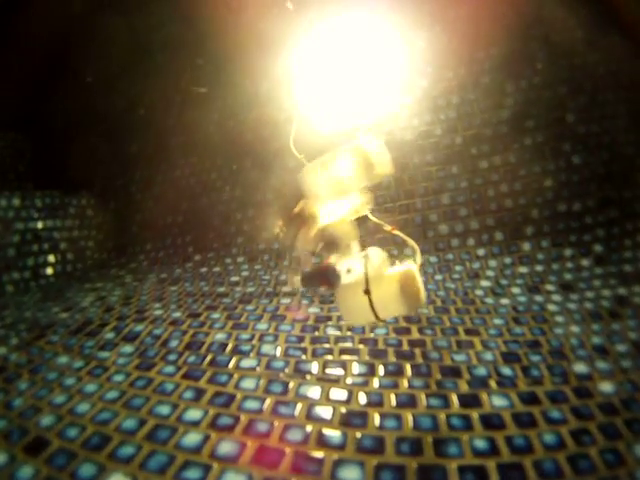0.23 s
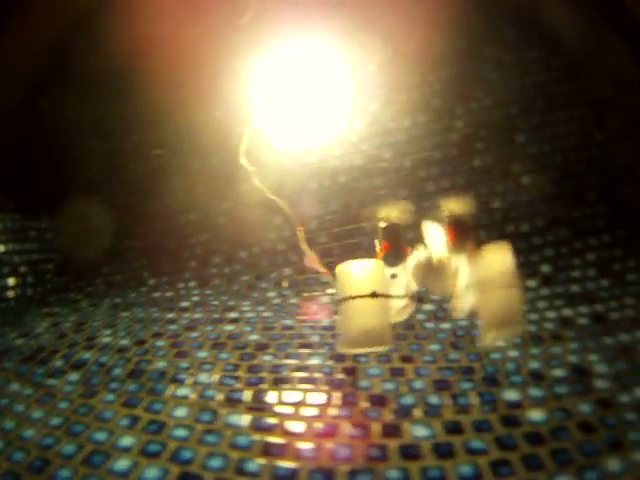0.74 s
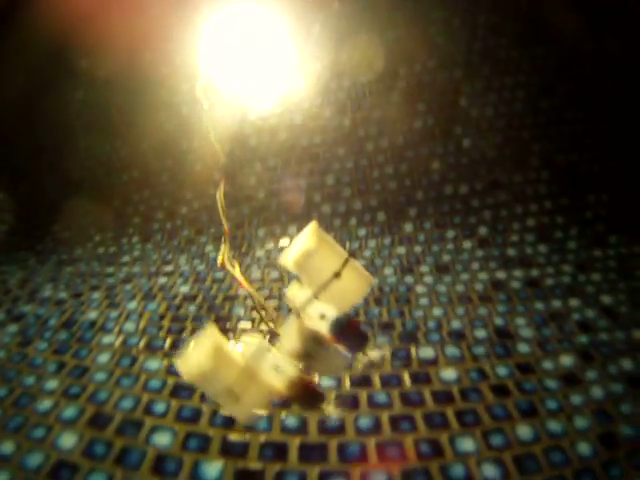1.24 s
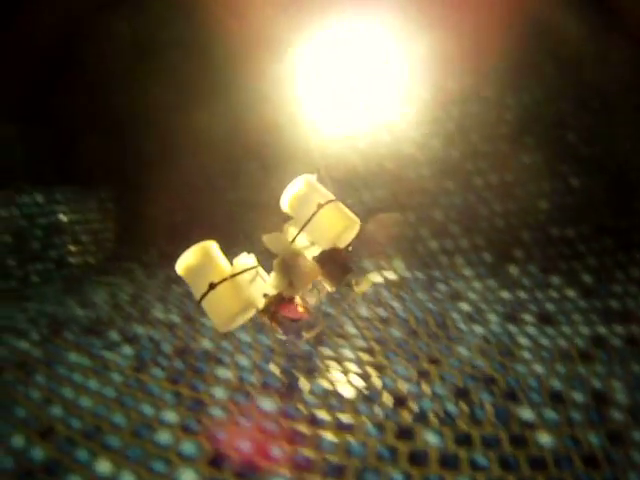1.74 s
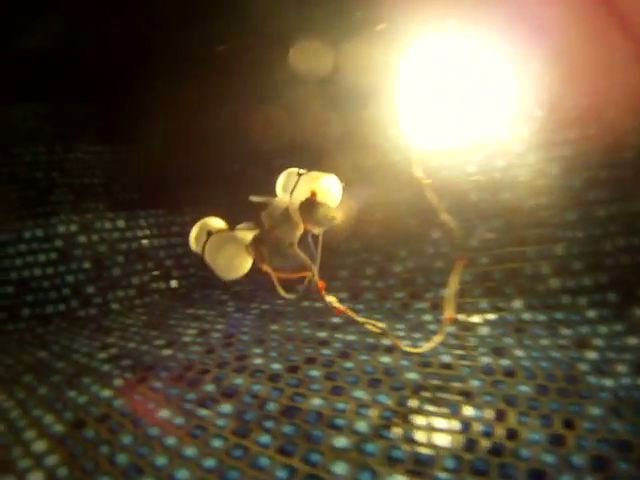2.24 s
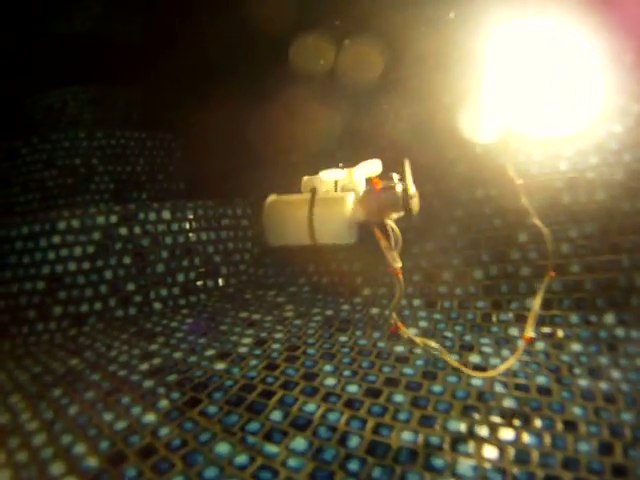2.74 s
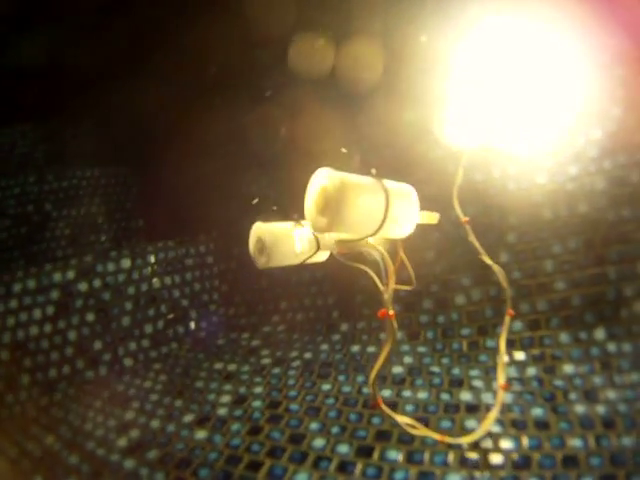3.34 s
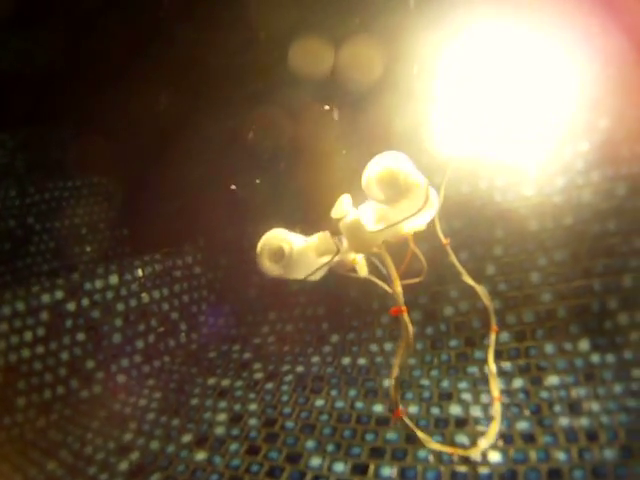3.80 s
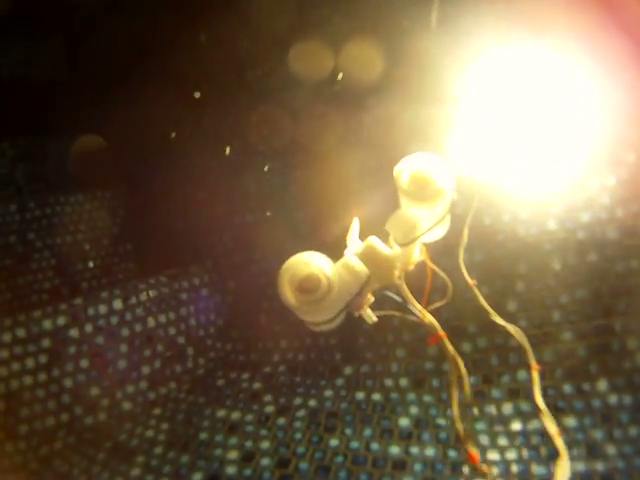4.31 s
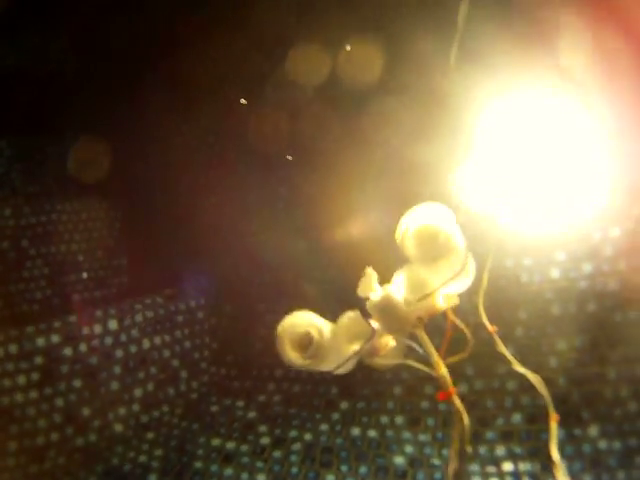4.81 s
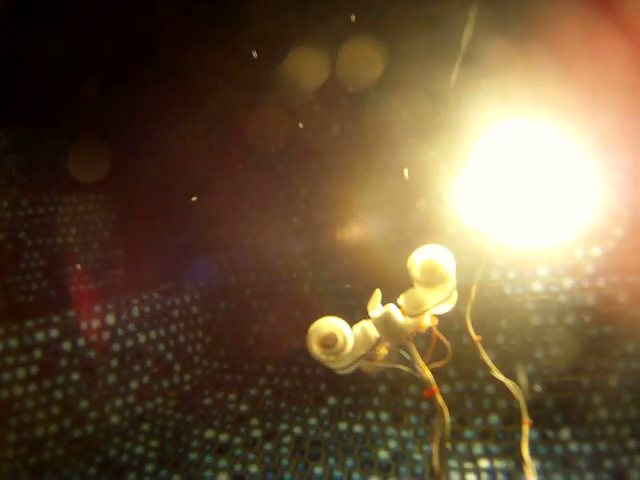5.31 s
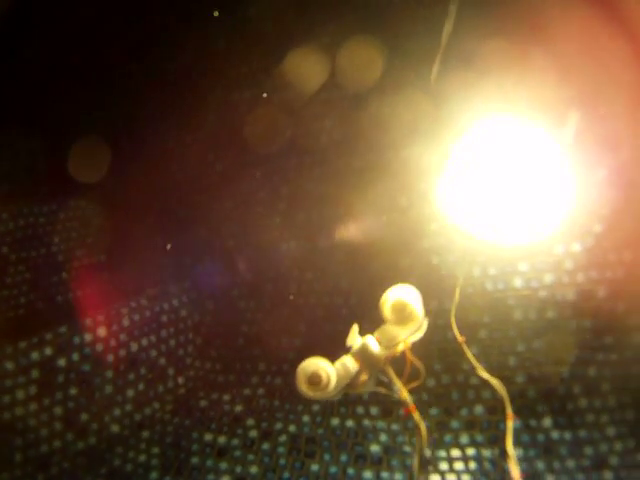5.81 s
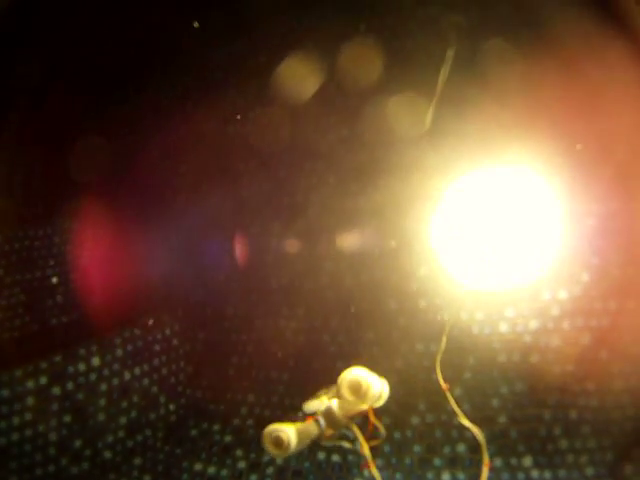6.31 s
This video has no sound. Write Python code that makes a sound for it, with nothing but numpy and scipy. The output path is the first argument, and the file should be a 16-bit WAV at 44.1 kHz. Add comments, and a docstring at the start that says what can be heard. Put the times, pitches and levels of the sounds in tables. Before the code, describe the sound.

Small propeller motors whirr and rattle under water in short spells, changing speed with clicks and knocks against a toy submarine's hull.

```python
"""Model submarine in a pool

Heard under water, small geared propeller motors run hard, churn slowly, stop, kick in with a loud
clack, idle and speed up again. Their gear teeth rub and knock, ringing the housing; the hull is tapped
and bumped. A camera holds each of its coarse samples, which mirrors the whirr into thin metallic treble."""
import sys
import numpy as np
from scipy import signal
from scipy.fft import rfft, irfft, next_fast_len
from scipy.io import wavfile
from scipy.ndimage import map_coordinates

SR = 44100
rng = np.random.default_rng(int(sys.argv[2]) if len(sys.argv) > 2 else 0)


def unload_wav(signal):
    """Save mono or channel-first audio to the path in sys.argv[1] as 16-bit WAV at rate SR, clipped to [-1, 1]."""
    wavfile.write(
        sys.argv[1],
        SR,
        np.round(np.clip(np.atleast_2d(signal).T, -1, 1) * 32767).astype(np.int16),
    )


N = 288841

# Rumble of the pool and microphone hiss: (frequency [Hz], level [dB])
WATER_SPECTRUM = [(12, -47.5), (20, -3.5), (65, -7.5), (86, -12), (166, -15.5), (195, -19), (396, -23.5),
                  (424, -23), (859, -29.5), (1170, -32), (1660, -33), (3780, -37), (5500, -32), (7150, -59),
                  (12100, -120)]
# The microphone's tone: (frequency [Hz], gain [dB])
MIC_RESPONSE = [(20, -2.5), (4000, -0.5), (5200, -7.5), (5700, -11.5), (6000, -5)]
# Each channel's own hiss: (frequency [Hz], level [dB])
HISS_SPECTRUM = [(30, -10.5), (250, -7.5), (4500, 1.5), (6000, -4), (9000, -5.5), (10000, -35)]
# Dull bumps against the camera: (time [s], level [dB], pitch [Hz], relative slap level [dB])
CAMERA_BUMPS = [(1.319, -31, 75, -7), (2.268, -42, 110, -1), (4.324, -44.5, 133, 4.5),
                (4.342, -23.5, 96.1, 1), (4.609, -34, 88.4, -20.5), (4.638, -36, 80, -22),
                (4.665, -32, 98.5, -22)]
# The notes a struck hull rings at: (pitch [Hz], level [dB], time to fade by 60 dB [s])
HULL_MODES = [(263, -4.5, 0.0301), (388.4, -5.5, 0.0216), (562.9, -0.5, 0.052), (701, -2, 0.0212),
              (1210.5, -3, 0.0207), (1537, -5.5, 0.0184), (2105, -1, 0.00945), (2528, -5, 0.0222),
              (3448, -9, 0.0051), (4301, -19, 0.00486)]
# Light taps on the hull: (time [s], strength [dB], center frequency [Hz])
HULL_TAPS = [(1.816, -30.5, 3400), (2.322, -45, 720), (2.5, -43, 1300), (4.098, -50, 640),
             (4.179, -44, 850), (4.351, -44, 2800), (4.411, -50, 2200)]
# Jolts as a motor cuts in or out, each with a second, weaker contact:
# (time [s], low body [dB], high edge [dB], weaker contact's offset [s], its relative level [dB])
SWITCH_JOLTS = [(2.210, -34, -47.5, 0.012, -12), (3.505, -38.5, -45.5, -0.014, -4),
                (4.438, -25.5, -20.5, -0.010, -14), (6.117, -29, -36, 0.016, -7.5)]
# How the housing rings under rubbing gears, their rattle, the motor brushes and a struck tooth:
# (pitch [Hz], width [Hz], level [dB])
GROWL_MODES = [(201.4, 19.8, -4.5), (269.4, 50.7, -6.5), (415.7, 158.5, -8.5), (558.7, 45.5, -0.5),
               (734.2, 52, 3), (797.2, 74.8, 0.5)]
RATTLE_MODES = [(953.7, 410, -3), (1245.2, 83.7, 2), (1445.3, 39.8, 1), (1715.4, 104.4, 2.5),
                (2054.7, 144.7, 0), (2436.7, 237, 1), (2638.7, 143.3, 1.5), (3350, 140, -4)]
FIZZ_MODES = [(2918, 750, -15.5), (3946, 840, -15), (4442, 100, -7), (5472, 196, -5)]
KNOCK_MODES = [(197, 57, -10.5), (565.9, 49, 0), (745.9, 84.7, 1.5), (812, 74.3, -6), (1249, 100, -19),
               (1678, 120, -21.5)]
# How much rattle gets through the case: (frequency [Hz], gain [dB])
CASE_RESPONSE = [(700, 3), (1000, -5), (2620, -1.5), (2820, -12), (3500, -14), (4200, -18.5), (6000, -40.5)]
# Clean gear tones at full speed: (multiple of the shaft speed, level [dB])
GEAR_HARMONICS = [(1, -14), (6, -15.5), (8, -19.5), (11, -18), (12, -13.5), (14, -14), (16, -12.5),
                  (18, -4.2), (21, -11), (22, -20.5), (23, -3.8), (24, -20.5), (37, -20.5), (45, -22.5),
                  (51, -16.5), (52, -22), (63, -29), (73, -15.5), (75, -18.5), (78, -19)]
# Spells of running:
# (on [s], off [s], base growl [dB], base rattle [dB], growl fade [dB/s], rattle fade [dB/s])
FAST_SPELL = (0, 2.215, -45.3, -50.6, 3.2, 0.3)
CHURN_SPELL = (2.23, 3.49, -52, -64, 6, 2.5)
IDLE_SPELL = (4.445, 6.11, -61.2, -60.5, 3.2, 4.2)
RESTART_SPELL = (6.125, 6.6, -51.5, -52, 6, 5.5)
# The fast motor sags and recovers with its load: (time [s], speed [turns/s])
FAST_TURN_RATE = [(0.0, 33.7), (0.1, 34.0), (0.21, 33.8), (0.53, 32.3), (0.77, 32.8), (1.15, 31.7),
                  (1.27, 32.3), (1.72, 33.1), (2.2, 32.3)]
# The slower spells run down, three strokes to a turn: (time [s], speed [strokes/s])
CHURN_STROKE_RATE = [(2.55, 68.5), (3.1, 62), (3.47, 60.8)]
IDLE_STROKE_RATE = [(4.47, 65.2), (4.8, 56), (5.25, 60), (6.09, 54.5)]
RESTART_STROKE_RATE = [(6.16, 84), (6.55, 80.2)]


def amp(db):
    """Turn decibels into a gain."""
    return 10 ** (np.asarray(db) / 20)


def unit(x):
    """Scale x to an average (rms) level of 1."""
    return x / np.sqrt(np.mean(x ** 2) + 1e-20)


def along(points, hz):
    """Read between (frequency [Hz], value) points on a log frequency axis."""
    freqs, values = np.transpose(points)
    return np.interp(np.log(hz + 1), np.log(freqs + 1), values)


def rise(start_s, length_s):
    """Stay at 0 until start_s, then climb steadily to 1."""
    return np.clip((np.arange(N) / SR - start_s) / length_s, 0, 1)


def wobble(rate):
    """A smooth curve through rate random values a second."""
    return map_coordinates(rng.standard_normal(int(N * rate / SR) + 4), [np.arange(N) * rate / SR])


def filtered(x, response):
    """Multiply each frequency f in x by response(f)."""
    size = next_fast_len(N + SR // 2)
    return irfft(rfft(x, size) * response(np.fft.rfftfreq(size, 1 / SR)), size)[..., :N]


def resonant(modes, f):
    """How strongly, and in what phase, a ringing object answers frequency f."""
    return sum((-1) ** k * amp(db) * 1j * f * width / (hz * hz - f * f + 1j * f * width)
               for k, (hz, width, db) in enumerate(modes))


def water():
    """Low rumble of the pool, microphone hiss and a faint mains hum."""
    rumble = unit(filtered(rng.standard_normal(N), lambda f: amp(along(WATER_SPECTRUM, f))))
    hum = amp(-59.5 + 3.2 * wobble(2.5)) * np.sin(2 * np.pi * 60 * np.arange(N) / SR)
    return amp(-54.5) * rumble + hum


def bumps():
    """Soft pushes on the camera's case: a brief bass thud under a short slap."""
    out, t = np.zeros(N + SR), np.arange(SR // 5) / SR
    for at, db, hz, slap_db in CAMERA_BUMPS:
        push = np.sin(2 * np.pi * hz * t) * amp(3.5 - 60 * t / 0.0557)
        slap_tones = np.sin(2 * np.pi * 210 * t) + 0.965 * np.sin(2 * np.pi * 430 * t)
        slap = amp(slap_db - 60 * t / 0.0226) * slap_tones
        attack = 1 - np.exp(-t / 0.000444)
        out[round(at * SR):][:len(t)] += amp(db) * (push + slap) * attack
    return filtered(out[:N], lambda f: 1 / (1 + (f / 680) ** 8))  # soft contact carries no treble


def hull_strike(at, force_db, crack_db):
    """One blow makes a short crack and rings each hull note as hard as force_db(pitch) says."""
    out, t = np.zeros(N + SR), np.arange(SR // 6) / SR
    ring = 0
    for k, (hz, db, fade_s) in enumerate(HULL_MODES):
        envelope = amp(db + force_db(hz) + rng.standard_normal() - 60 * t / fade_s)
        ring += envelope * (-1) ** k * np.sin(2 * np.pi * hz * rng.normal(1, 0.023) * t)
    crack = amp(crack_db - 60 * t / 0.00542) * rng.standard_normal(len(t))
    out[round(at * SR):][:len(t)] = ring + crack
    return out[:N]


def gear_blow(at, body_db, edge_db):
    """The gears jolt the hull: the blow's body rings the low notes, its edge the high ones."""
    top_db = edge_db + .5 * (edge_db - body_db)  # only a hard blow reaches the top note
    force = [(260, body_db + 2.5), (400, body_db + 5), (560, body_db + 3), (700, body_db + 5),
             (1200, body_db - 4.5), (2000, edge_db + 7.5), (3400, edge_db + 4), (4300, top_db + 6)]
    return hull_strike(at, lambda hz: along(force, hz), crack_db=edge_db - 4.5)


def clacks():
    """Loose gears strike twice as a motor switches; the hull is tapped and finally chatters."""
    out = np.zeros(N)
    rebound_s, tap_db_per_octave = 0.0038, 14
    for start, body_db, edge_db, offset, weaker_db in SWITCH_JOLTS:
        weaker_contact = (start + offset, body_db + weaker_db, edge_db + weaker_db - 3)
        for at, body, edge in ((start, body_db, edge_db), weaker_contact):
            out += gear_blow(at, body, edge)
            out += gear_blow(at + rebound_s, body - 7, edge - 12)  # a softer, duller bounce
    for at, db, center_hz in HULL_TAPS:
        force_db = lambda hz: db + 4 - tap_db_per_octave * abs(np.log2(hz / center_hz))
        out += hull_strike(at, force_db, crack_db=force_db(4000) - 5)
    chatter_at_s, gap_s = 6.433, 0.025
    for k, (late, strength) in enumerate(rng.standard_normal(size=(5, 2))):
        out += gear_blow(chatter_at_s + gap_s * (k + 0.12 * late), -46 + 2 * strength, -57 + 2 * strength)
    return out


def spell(row, ramp_s=0.024):
    """A spell of running: its on-off gate and its fading growl and rattle levels in dB."""
    on, off, growl_db, rattle_db, growl_fade, rattle_fade = row
    age = np.clip(np.arange(N) / SR - on, 0, off - on)
    gate = rise(on - ramp_s, ramp_s) * (1 - rise(off, ramp_s))
    return gate, growl_db - growl_fade * age, rattle_db - rattle_fade * age


def count_cycles(speeds, stroke_at_s):
    """Count a slightly unsteady motor's cycles from the moment a strong stroke lands."""
    rate = np.interp(np.arange(N) / SR, *np.transpose(speeds))
    cycles = np.cumsum(rate * (1 + 0.00201 * wobble(20))) / SR
    return cycles - np.interp(stroke_at_s * SR, np.arange(N), cycles)


def load(cycles, depth_db, sharp=2):
    """The load bites quickly once a cycle and lets go slowly; a higher sharp shortens the bite."""
    phase = (cycles + .2) % 1
    return amp(depth_db * np.minimum(phase / .12, (1 - phase) / .88) ** sharp)


def grind(turns, rough):
    """Worn teeth rub alike on every turn; rough is the share of loose play that never repeats."""
    teeth = irfft(np.exp(2j * np.pi * rng.random(2 ** 9 + 1)))
    repeating = unit(map_coordinates(teeth, [turns % 1 * len(teeth)], mode="grid-wrap"))
    rough = np.clip(rough, 0, 1)
    return np.sqrt(1 - rough) * repeating + np.sqrt(rough) * rng.standard_normal(N)


def tilt(f, db_per_octave):
    """A gain that brightens (positive) or darkens (negative) the middle frequencies."""
    return amp(db_per_octave * np.log2(np.clip(f, 150, 3000) / 1000))


def gear_growl(turns, force, db, rough, bright):
    """Rubbing gears ring the housing's low notes; bright is a tilt in dB per octave."""
    response = lambda f: resonant(GROWL_MODES, f) * tilt(f, bright)
    return amp(db) * unit(filtered(grind(turns, rough) * force, response))


def gear_rattle(turns, force, db, rough, bright):
    """Rubbing gears ring the housing's high notes, muffled by the case."""
    response = lambda f: resonant(RATTLE_MODES, f) * amp(along(CASE_RESPONSE, f)) * tilt(f, bright)
    return amp(db) * unit(filtered(grind(turns, rough) * force, response))


def tooth_knocks(cycles, db, accents=1):
    """A tooth strikes once a cycle and rings the housing briefly."""
    new_cycle = np.diff(np.floor(cycles), prepend=np.floor(cycles[0]))
    hits = new_cycle * accents * amp(1.72 * rng.standard_normal(N))
    return amp(db) * unit(filtered(hits, lambda f: resonant(KNOCK_MODES, f)))


def gear_tones(turns):
    """Meshing teeth sing at wavering multiples of the shaft speed."""
    shaft_hz = np.diff(turns).mean() * SR
    out = np.zeros(N)
    for k, db in GEAR_HARMONICS:
        level = amp(db + 1.6 * wobble(7))
        # a quarter cycle before or after the knock's ring, so the tone sounds on between knocks
        phase = np.angle(resonant(KNOCK_MODES, k * shaft_hz)) + rng.choice([-1, 1]) * np.pi / 2
        out += level * np.cos(2 * np.pi * k * turns + phase + 0.25 * wobble(24))
    return out


def idle():
    """Kicked into motion, the gears slow to a faint ticking."""
    gate, growl_db, rattle_db = spell(IDLE_SPELL)
    kick = 1 - rise(IDLE_SPELL[0] + 0.15, 0.255)  # the extra effort of starting
    growl_db, rattle_db = growl_db + 16.3 * kick, rattle_db + 11.3 * kick
    strokes = count_cycles(IDLE_STROKE_RATE, stroke_at_s=4.5145)
    ticks = load(strokes, 5.16) * load(2 * strokes, 8.7)
    growl = gear_growl(strokes / 3, load(strokes, 3), growl_db, rough=0.5, bright=0.4)
    rattle = gear_rattle(strokes / 3, ticks, rattle_db, rough=0.64, bright=6)
    knocks = tooth_knocks(strokes + 0.025 * wobble(45), growl_db - 2)
    return gate * (growl + rattle + knocks)


def churn():
    """Low speed under load: three strokes to a turn, one of them nearly missing."""
    gate, growl_db, rattle_db = spell(CHURN_SPELL)
    growl_db = growl_db - 9.5 * (1 - rise(2.64, 0.15))  # quieter until the load bites
    strokes = count_cycles(CHURN_STROKE_RATE, stroke_at_s=2.932)
    accents = amp(-10 * (np.floor(strokes + .2) % 3 == 2))
    growl = gear_growl(strokes / 3, accents * load(strokes, 4.06), growl_db - 0.5, rough=0.38, bright=2)
    rattle = gear_rattle(strokes / 3, load(strokes, 2.5), rattle_db, rough=0.585, bright=-3.58)
    knocks = tooth_knocks(strokes + 0.01 * wobble(45), growl_db - 2, accents)
    return gate * (growl + rattle + knocks)


def restart():
    """Medium speed: crisp ticks, a growl on every second one and a gear tone; low churning joins in."""
    gate, growl_db, rattle_db = spell(RESTART_SPELL)
    strokes = count_cycles(RESTART_STROKE_RATE, stroke_at_s=6.228)
    throb = load(strokes / 2 + 0.217, 15.7)
    growl = gear_growl(strokes / 3, throb, growl_db - 1.5, rough=0.52, bright=5.5)
    rattle = gear_rattle(strokes / 3, load(strokes, 17), rattle_db, rough=0.28, bright=8.5)
    tone = amp(growl_db - 4 + 3 * wobble(37)) * np.sin(2 * np.pi * 10 * strokes + 0.45 * wobble(43))
    churning_modes = [(167, 73, 4.5), (280, 106, -11.5), (496, 90, 1.5), (900, 77, -5.5)]
    churning = unit(filtered(rng.standard_normal(N), lambda f: resonant(churning_modes, f)))
    return gate * (growl + rattle + tone + amp(-49.5) * rise(6.406, 0.024) * churning)


def second_motor(turns, growl_db, rattle_db):
    """A slightly slower motor blurs the pitch of the main one."""
    slower = .965 * turns
    growl = gear_growl(slower, 1, growl_db - 0.5, rough=0.49, bright=-0.86)
    return growl + gear_rattle(slower, load(6 * slower, 5.5), rattle_db - 2.5, rough=0.275, bright=-1.5)


def brush_fizz(turns, ticks):
    """The motor's brushes scrape its spinning contacts, harder late in the fast spell."""
    fizz = unit(filtered(grind(turns, 0.39) * ticks, lambda f: resonant(FIZZ_MODES, f)))
    return amp(-67.5 + 7 * rise(1.42, 0.3)) * fizz


def fast_run():
    """Full speed: each turn brings a knock and six ticks of the motor's contacts, over a gear whine."""
    gate, growl_db, rattle_db = spell(FAST_SPELL)
    t = np.arange(N) / SR
    surge_db = 7 * np.exp(-t / 0.08)
    swing_db = 4.5 * np.exp(-((t - 1.19) / 0.21) ** 2)  # more rattle as the hull swings round
    rattle_db = rattle_db + surge_db + swing_db
    turns = count_cycles(FAST_TURN_RATE, stroke_at_s=.326)
    settled = rise(0, 1.657)  # the loose, throbbing gears settle into a cleaner whine
    ticks = load(turns - 0.06, 8.5 - 5 * settled, sharp=3) * load(6 * turns, 11.56)
    growl = gear_growl(turns, load(turns, 6), growl_db, rough=0.6, bright=-0.81)
    rattle = gear_rattle(turns, ticks, rattle_db, rough=.35 - 0.14 * settled, bright=-2)
    knocks = tooth_knocks(turns, growl_db - 1.5 - 3 * settled ** 4)
    second = amp(-11 * settled ** 2) * second_motor(turns, growl_db, rattle_db)
    whine = amp(growl_db + 4.2 + 4.5 * settled) * unit(load(turns, 3)) * gear_tones(turns)
    return gate * (growl + rattle + knocks + second + whine + brush_fizz(turns, ticks))


def scene():
    """All sources reach one microphone, which feeds both channels."""
    mono = fast_run() + churn() + idle() + restart() + clacks() + bumps() + water()
    return np.array([mono, mono])


def record(dry):
    """The camera holds each coarse sample until the next, mirroring the sound into the treble."""
    hold_hz, top_hz = 12000, 15300
    heard = filtered(dry, lambda f: amp(along(MIC_RESPONSE, f)))
    coarse = signal.resample_poly(heard, hold_hz, SR, axis=1)
    held = signal.resample_poly(np.repeat(coarse, 8, axis=1), SR, 8 * hold_hz, axis=1)
    hiss = amp(-79.5) * unit(filtered(rng.standard_normal((2, N)), lambda f: amp(along(HISS_SPECTRUM, f))))
    return filtered(held[:, :N] + hiss, lambda f: f < top_hz)


dry = scene()
out = record(dry)
unload_wav(out)
```